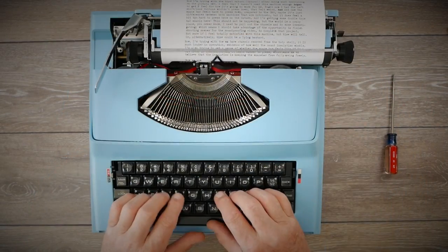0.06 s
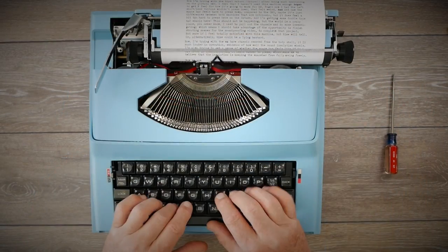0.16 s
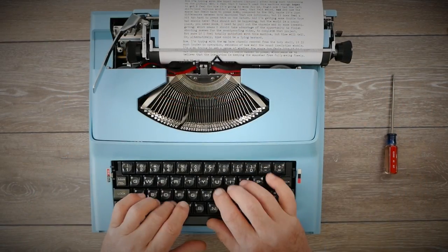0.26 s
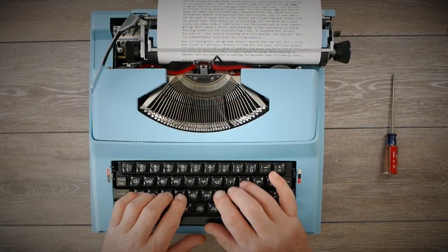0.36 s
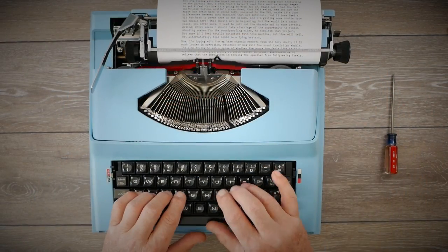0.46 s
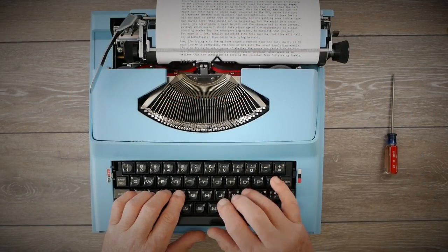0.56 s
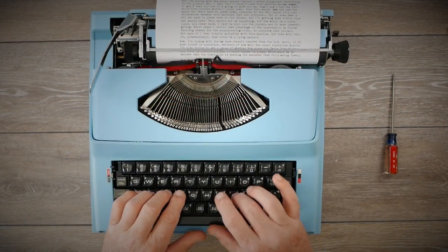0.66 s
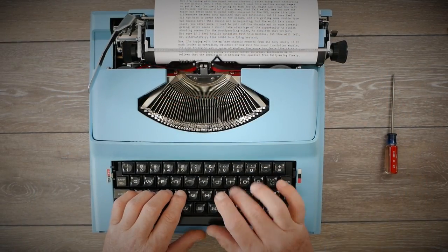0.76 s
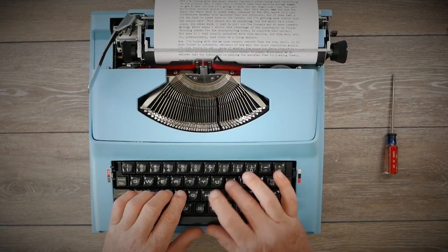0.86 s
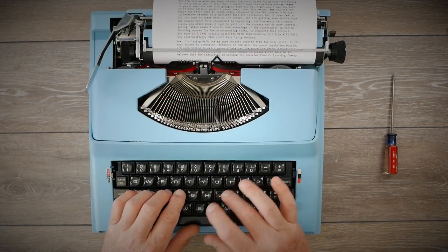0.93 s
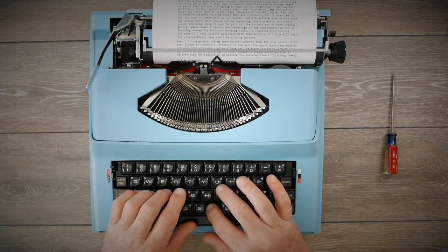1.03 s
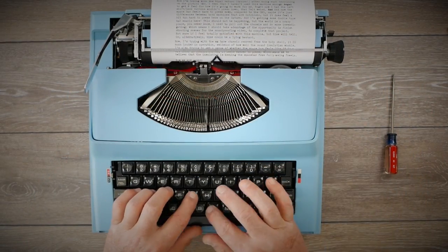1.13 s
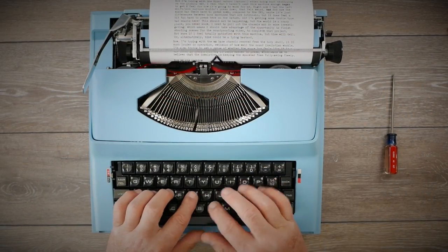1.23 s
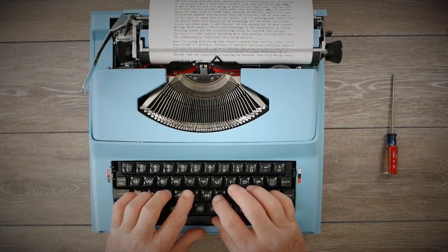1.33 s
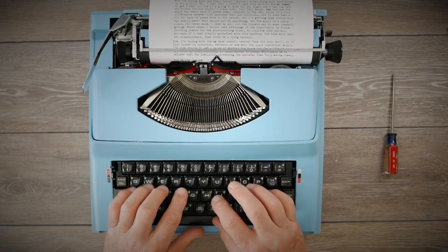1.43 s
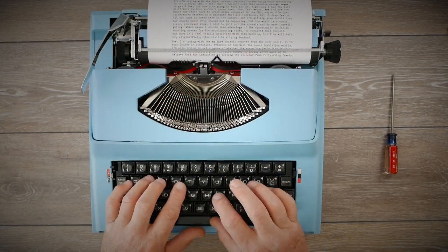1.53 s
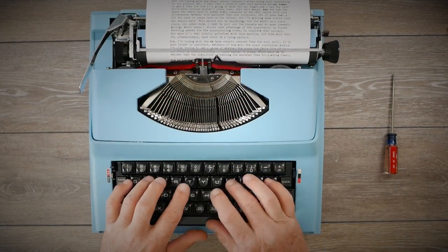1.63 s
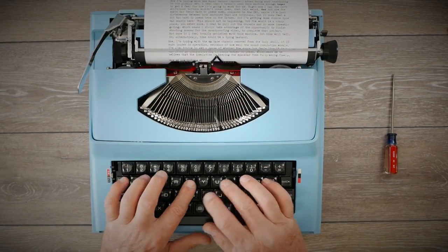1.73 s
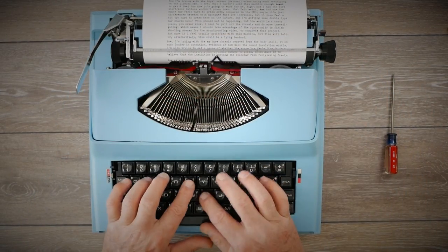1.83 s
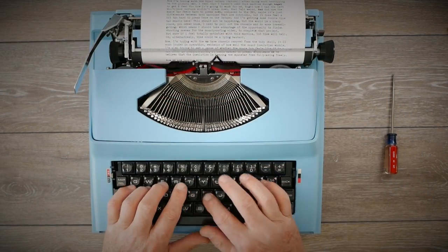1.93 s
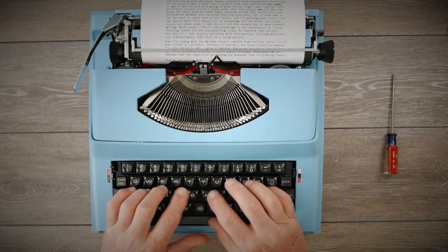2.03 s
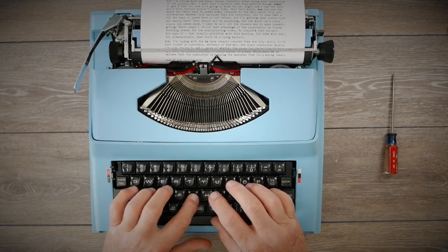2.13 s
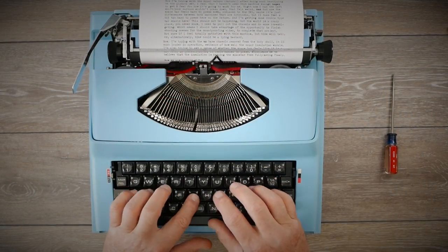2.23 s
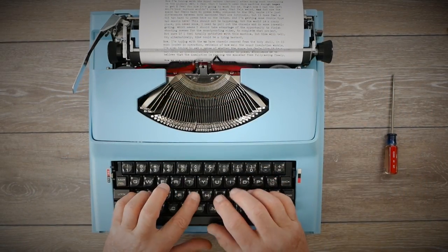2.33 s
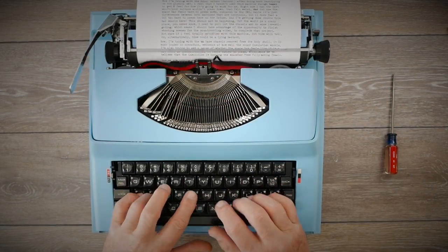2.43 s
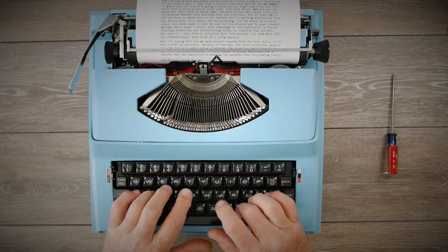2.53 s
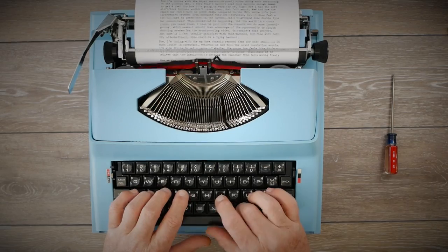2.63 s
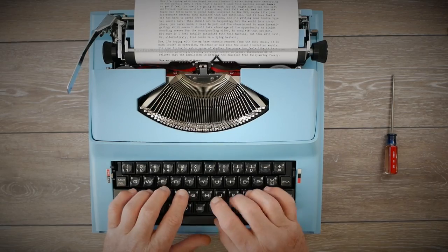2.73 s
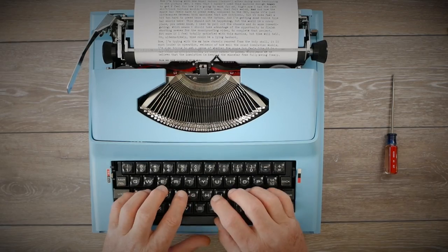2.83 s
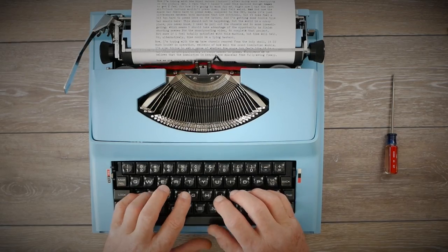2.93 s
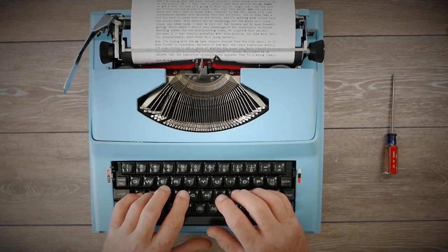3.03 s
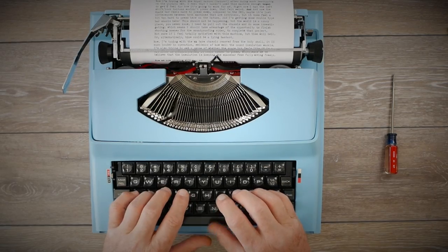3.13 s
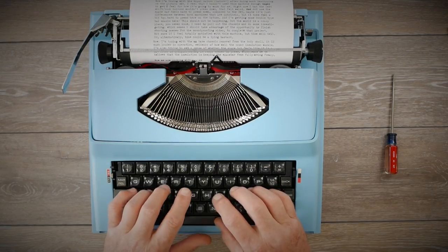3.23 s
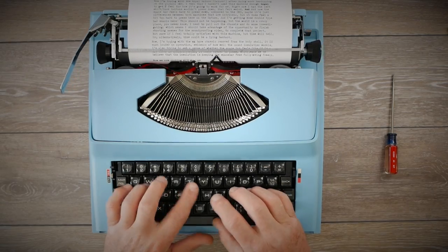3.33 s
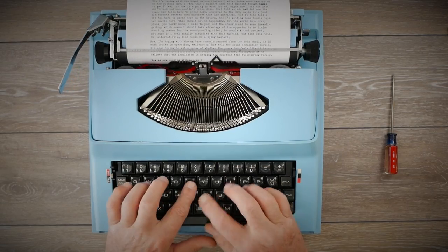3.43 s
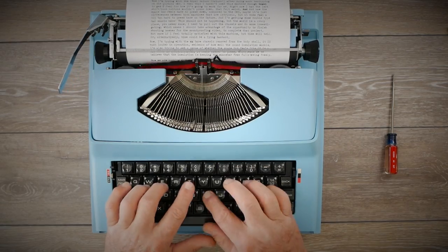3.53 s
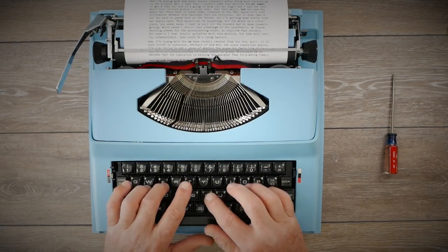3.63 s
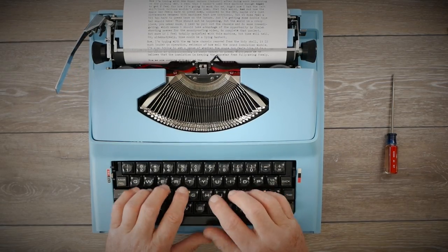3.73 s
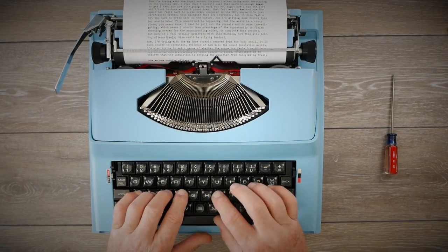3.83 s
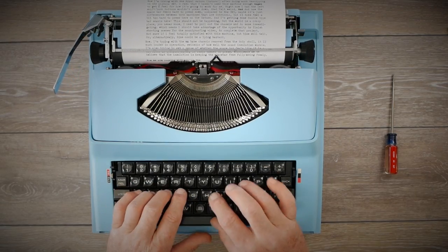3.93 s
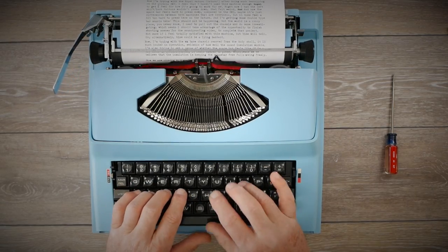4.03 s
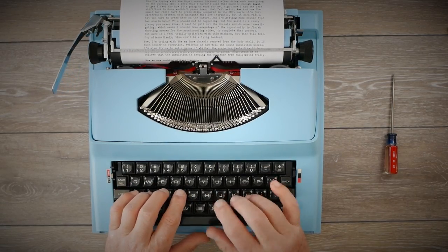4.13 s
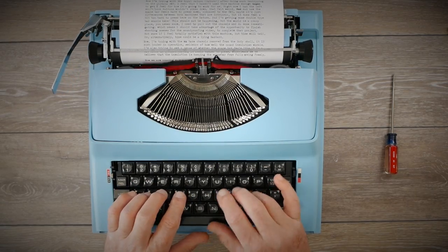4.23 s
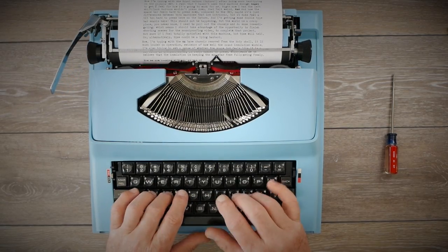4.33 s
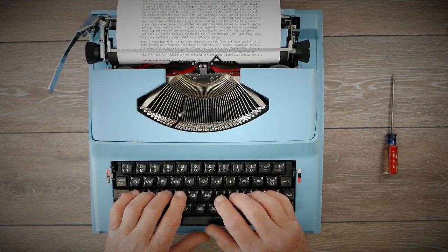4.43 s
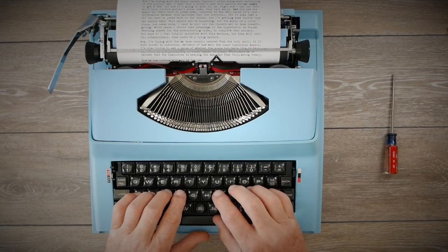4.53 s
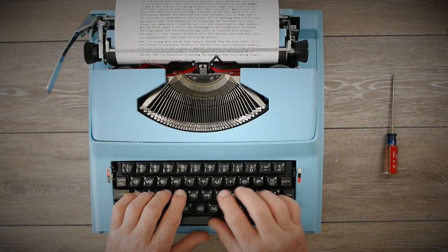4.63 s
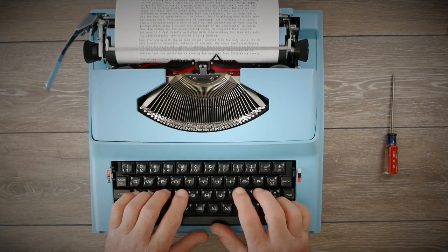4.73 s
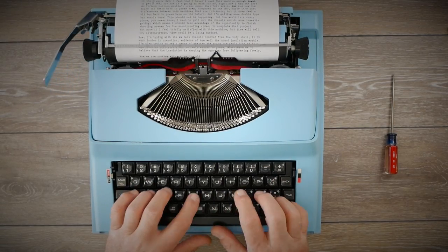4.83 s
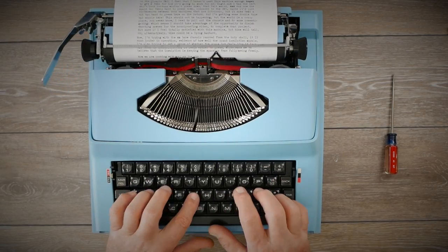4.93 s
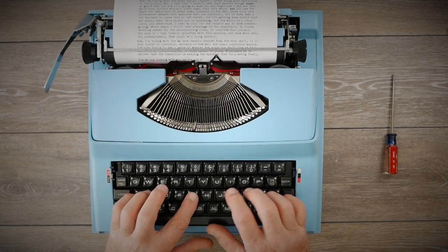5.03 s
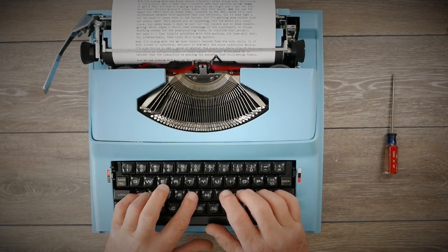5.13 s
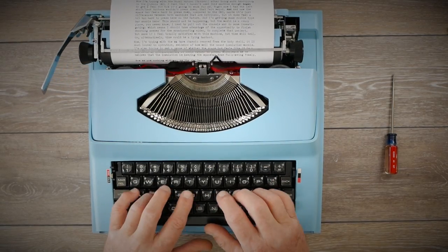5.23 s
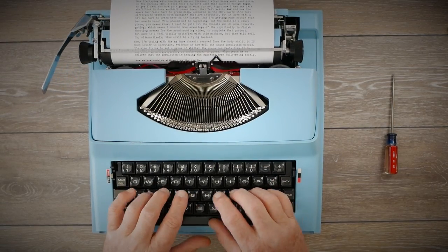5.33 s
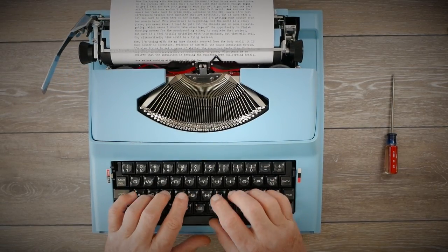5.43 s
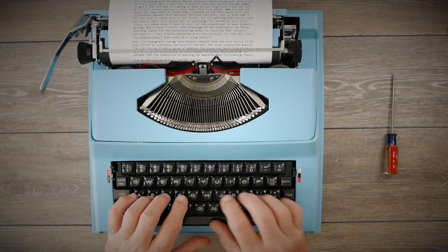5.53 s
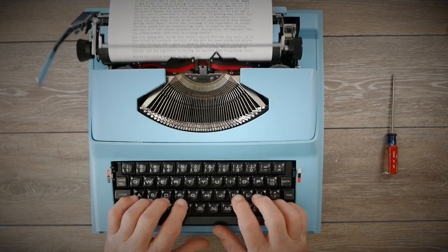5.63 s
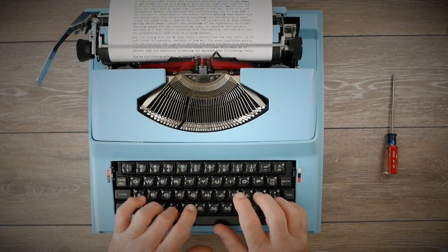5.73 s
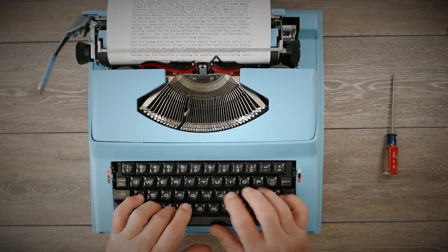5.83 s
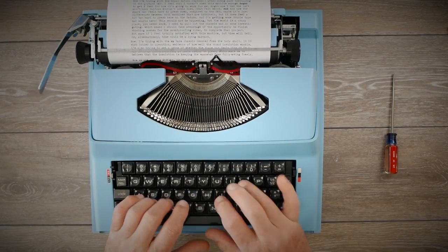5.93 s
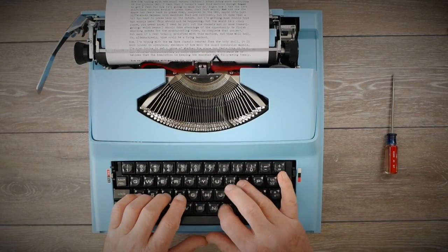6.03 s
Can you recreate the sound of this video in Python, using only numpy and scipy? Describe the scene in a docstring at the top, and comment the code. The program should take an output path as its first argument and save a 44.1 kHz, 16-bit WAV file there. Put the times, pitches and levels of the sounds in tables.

```python
"""A quiet room, where someone types fast on a typewriter, heard from close above and clipped at the loudest.
Each keystroke is a flurry of lever knocks, a soft thud of the key and the crack of the type slug on the roller
(the platen), then the rattle of the carriage step and the falling type bar. Parts that ring are decaying sines;
rough contacts are short bursts of uneven noise. Echoes of the room, a low rumble, hum and faint noise lie around."""
import sys
import numpy as np
from scipy import signal
from scipy.io import wavfile

SR = 44100
rng = np.random.default_rng(int(sys.argv[2]) if len(sys.argv) > 2 else 0)


def pcm_store(signal):
    """Save signal as 16-bit PCM."""
    levels = np.round(np.clip(np.atleast_2d(signal), -1, 1) * 32767)
    wavfile.write(sys.argv[1], SR, levels.astype(np.int16).T)


N = 267819  # length in samples

# One row per keystroke, timed by the slug hitting the platen; the leads count back from that hit.
# Levels are set before each layer's own trim: start_s, level_db, brightness_db, guide_lead_s (bar enters its guide),
# guide_level_db, pull_lead_s (lever pulls), pull_level_db, home_level_db (bar drops home), thud_level_db
STRIKES = [(0.2185, -3, -5, .007, -3, .028, -6, -26, -14), (0.3487, -3, -4, .0067, -7, .026, -17, -36, -17),
           (0.4794, -2.5, -7, .008, -8, .027, -16.5, -26, -23),
           (0.6868, -2.5, -3, .0078, -3.5, .027, -12, -40, -20),
           (0.8955, -3, -5, .0065, -5, .026, -12, -40, -18),
           (1.1021, -3, -3, .0064, -5, .031, -15, -29, -18),
           (1.1924, -2.5, -2, .0039, -11, .0105, -17, -33, -27),
           (1.6023, -3.5, 3, .0077, -3.5, .029, -10, -27, -20),
           (1.6512, -3.5, 0, .005, -13, .026, -18, -33, -30),
           (1.7797, -3, 2, .0065, -8, .029, -19, -33, -20.5),
           (1.9092, -2, 2, .0052, -7, .030, -19.5, -35, -22),
           (2.1971, -1.5, 2, .0044, -8, .031, -18, -36, -17),
           (2.3701, -3, 1, .0075, -6, .029, -15, -27, -23),
           (2.4232, -3, 2, .0046, -13, .018, -21, -33, -36),
           (2.6303, -2, -1, .0081, -6, .027, -17, -27, -19.5),
           (2.9208, -3, 0, .0092, -9, .0285, -8, -38, -20),
           (3.0525, -3, 2, .0077, -10, .0286, -21, -26, -26.5),
           (3.416, -4, -2, .0054, -8, .026, -19, -31, -23.5),
           (3.5445, -2.5, 1, .005, -11, .031, -25, -28, -24.5),
           (3.6365, -2.5, 1, .0075, -13.5, .026, -33, -35, -29),
           (4.0423, -2, 4, .0083, -8, .027, -21, -33, -21.5),
           (4.2502, -3, 4, .0084, -6, .025, -19, -28, -22.5),
           (4.3788, -2, 4, .0081, -12, .026, -22, -38, -25),
           (4.9014, -3, 6, .005, -7.5, .031, -15, -42, -22),
           (5.1138, -2, 6, .0078, -11, .030, -20, -30, -27),
           (5.2065, -3, 4, .0072, -15, .027, -24, -44, -38),
           (5.7688, -4, 6, .006, -11, .028, -14, -38, -24),
           (6.0168, -2, 6, .0077, -9.5, .0254, -16.5, -30, -27)]
BANDS_HZ = 200 * 2 ** np.arange(0, 6.5, .4)  # centres of the filter bank


def amp(db):
    """Turn decibels into a gain."""
    return 10 ** (np.asarray(db) / 20)


def rms_one(x):
    """Scale a sound to an average (rms) strength of 1."""
    return x / np.sqrt(np.mean(x ** 2) + 1e-20)


def at_hz(points, hz):
    """Read a level off a curve of (pitch, level) points, with pitch on a log scale."""
    points_hz, points_db = np.array(points).T
    return np.interp(np.log(hz), np.log(points_hz), points_db)


def clicks(s, gains):
    """Place one-sample clicks of the given heights at the given times."""
    out = np.full(N, 1e-18)
    places = (np.asarray(s) * SR).astype(int)
    np.add.at(out, np.minimum(places, N - 1), gains)
    return out


def ring(x, hz, t60):
    """A click sets a sine ringing, which falls by 60 dB in t60 seconds."""
    radius, angle = amp(-60 / (t60 * SR)), 2 * np.pi * hz / SR
    return signal.lfilter([0, np.sin(angle)], [1, -2 * radius * np.cos(angle), radius ** 2], x)


def fade(x, t60):
    """Each click becomes a sudden step that dies away."""
    return signal.lfilter([1], [1, -amp(-60 / (t60 * SR))], x)


def band(x, hz):
    """Keep only a narrow range of pitches around hz."""
    edges = [hz / 2 ** .2, hz * 2 ** .2]
    return signal.sosfilt(signal.butter(2, edges, "band", fs=SR, output="sos"), x)


def colour_db(hz, bright_db, body_db):
    """A hard contact lifts the treble, a heavy one the low body of the machine."""
    treble = np.clip(np.log2(hz / 4000), 0, 1)
    low = np.clip(np.log2(2500 / hz), 0, 1)
    return treble * bright_db + low * body_db


def grit(spread_db):
    """Noise made of uneven tiny impacts, at rms 1."""
    unevenness = np.minimum(rng.exponential(1, N), 4)
    return rms_one(rng.standard_normal(N) * amp(spread_db * unevenness))


def knocks(s, peak_db, bright_db, body_db, rise_s, t60, tail_db, tail_t60, scatter_db):
    """Bursts of grit, each with its own colour: a brief swell, a quick decay and a slower tail."""
    # noise spectrum of a knock: pitch_hz, level_db (per Hz)
    spectrum = [(300, -9), (600, -8), (1300, -2), (2000, -1), (3500, 1), (7000, -2.5), (10000, -7),
                (14000, -14), (17000, -15)]
    noise, out = [grit(2.2), grit(2.0)], 0
    scatter = rng.normal(0, scatter_db, (len(s), len(BANDS_HZ)))
    swell = np.exp(-1 / (rise_s * SR))
    for k, hz in enumerate(BANDS_HZ):
        gains = amp(peak_db + colour_db(hz, bright_db, body_db) + scatter[:, k])
        slower = (3000 / hz) ** 0.19  # lows last longer
        # squared gains are powers, which fade twice as fast in dB
        quick = fade(clicks(s, gains ** 2), t60 * slower / 2)
        tail = fade(clicks(s, (gains * amp(tail_db)) ** 2), tail_t60 * slower / 2)
        shape = np.sqrt(signal.lfilter([1 - swell], [1, -swell], quick + tail))
        out = out + amp(at_hz(spectrum, hz)) * band(shape * noise[k % 2], hz)
    return out


def struck(modes, s, peak_db, scatter_db, bright_db=0):
    """Every blow sets every mode ringing, with a strength and sign of its own."""
    size = (len(s), len(modes))
    strength = amp(rng.normal(0, scatter_db, size)) * rng.choice([-1, 1], size)
    out = 0
    for k, (hz, db, t60, *lift) in enumerate(modes):
        gains = amp(peak_db + db + sum(lift) * bright_db) * strength[:, k]
        out = out + ring(clicks(s, gains), hz, t60)
    return out


def slugs():
    """The crack on the platen: short ringing modes, a burst of grit and thin levers set ringing."""
    # slug, platen and paper: pitch_hz, level_db, t60_s, lift (dB gained per dB of brightness)
    platen = [(1450, -15.5, .016, 0), (2000, -17, .008, 0), (3000, -10, .011, -.6), (3800, -6.5, .009, 0),
              (4620, -5, .009, -.4), (6200, -9, .007, .3), (7200, -5, .010, .9), (9400, -7, .006, 0),
              (11000, -11, .004, -.3), (13500, -13, .004, -.5)]
    # thin levers that ring on faintly: pitch_hz, level_db, t60_s
    levers = [(6415, -58, .5), (10150, -64, 1.1), (10260, -64, .8), (10340, -65, .9)]
    s, peak_db, bright_db = np.transpose(STRIKES)[:3]
    crack = struck(platen, s, peak_db + 1.5, scatter_db=2.5, bright_db=bright_db)
    burst = knocks(s, peak_db - 3.0, bright_db, body_db=-9.5, rise_s=0.00022, t60=.009,
                   tail_db=-7, tail_t60=0.038, scatter_db=2.5)
    return crack + burst + struck(levers, s, peak_db, scatter_db=3.0)


def thuds():
    """Soft blows ring the low modes of the case, which radiates little below them."""
    # space bar and keys that bottom without printing: start_s, level_db
    silent_keys = [(0.042, -14), (1.329, -29), (1.525, -26), (1.697, -28), (3.188, -35), (3.353, -32.5),
                   (3.955, -28.5), (4.655, -26), (4.784, -23), (5.52, -34), (5.663, -30.5)]
    # low modes of the case: pitch_hz, level_db, t60_s
    case = [(160, -6, 0.11), (243, -4.5, 0.042), (339, -5, 0.1), (449, -6, 0.13)]
    lead_s = .021  # the key bottoms this long before the slug strikes
    printing_keys = [(row[0] - lead_s, row[-1]) for row in STRIKES]
    s, peak_db = np.transpose(printing_keys + silent_keys)
    soft = signal.lfilter([.03], [1, -.97], struck(case, s, peak_db - 1.5, scatter_db=0.0))
    return signal.sosfilt(signal.butter(2, 110, "high", fs=SR, output="sos"), soft)


def all_contacts():
    """List the run of parts knocked in each keystroke, then the loose knocks, in the columns of loose."""
    # knocks between strikes (fingers landing, keys let go, space bar):
    # start_s, level_db, brightness_db, body_db, pitch_hz, tail_db (against the peak)
    loose = [(0.0082, -36, -5, -8, 1360, 0), (0.017, -35, -14, 0, 2330, 0),
             (0.0272, -15.5, -2, 1.5, 1280, -2.5), (0.0403, -17, 1.5, 2, 2220, -2),
             (0.0948, -36, -1, 6, 1280, 2), (0.154, -7.5, 3.5, -12, 4440, -27),
             (0.1668, -11, 5, -3, 3990, -9.5), (0.183, -13, 1, -11, 4840, -2), (0.53, -32, -8, 6, 1300, -2),
             (0.5916, -33, -15, 5, 1220, -1), (0.625, -34, 0, -11, 3400, 0),
             (0.632, -20.5, 2, -13, 6310, -9), (0.648, -25, 7, -11, 6170, -3),
             (0.797, -34, -15, 8, 900, -3), (0.8375, -22, 2, -1, 9100, -2.5),
             (0.8473, -22, 8.5, -27, 11300, -7), (1.02, -38, -19, 15, 1190, -3.5),
             (1.0353, -17, 3, -25, 4670, -12), (1.045, -17, 7.5, -11, 9240, -12),
             (1.2835, -26.5, -4, -6, 6590, -3), (1.312, -33, -1, 10, 2580, -4),
             (1.3324, -28, -1, -5, 4260, 0.5), (1.358, -35.5, -14, 5, 2180, -2),
             (1.4731, -42, -15, 12, 900, -2), (1.5074, -21.5, -7.5, 3.5, 6610, -4.5),
             (1.5203, -18.5, -6, -17, 2280, -4.5), (1.5251, -17.5, 7, 0, 8400, -15),
             (1.5338, -23, 12, 6, 2310, -8), (1.7385, -27, 5, 0, 10550, 1.5),
             (2.062, -25, -2.5, -3, 6700, -1), (2.1465, -22, 3, -7, 5760, -9), (2.3033, -38, 4, 3, 1840, 5),
             (2.5493, -29.5, 7, -13, 4010, -5), (2.5554, -24, 3, -4, 4900, -15),
             (2.5778, -33, 6, -6, 1550, -5), (2.755, -38, -20, 4.5, 1200, -3.5),
             (2.8647, -35, 0, -3, 2390, -1), (2.872, -15.5, -6.5, 2, 6300, -9.5),
             (2.9741, -24, -3, -7, 1870, -5), (3.1866, -26.5, -3.5, -7, 5460, -3),
             (3.3341, -21, -8, 0, 6470, -4), (3.3511, -25.5, -9, -8, 4440, -6),
             (3.364, -23, 7.5, -1, 11010, -5.5), (3.3723, -24.5, 8, -4, 5200, -5),
             (3.5575, -22, -5, -13, 3330, 2), (3.6494, -16, 1, -14, 3480, -4),
             (3.8039, -32, -4, -5, 6070, -1), (3.9352, -19, -7, 0, 6170, -5),
             (3.9517, -30.5, -16, 3, 4290, -1), (3.9656, -18.5, 9.5, -14, 8400, -8),
             (4.1928, -29, 7, -18, 6030, -13), (4.2044, -30, 2, -3, 4060, -3),
             (4.3233, -30, 9, -9, 4690, -2), (4.515, -29, -3.5, -4, 5230, -1),
             (4.5835, -39, 0, -10, 4120, -12), (4.6415, -20, -5, 1, 1300, -3.5),
             (4.6585, -25, -6, -8.5, 2350, -6), (4.691, -36, -6.5, 1, 2480, -7),
             (4.7186, -35, 7, -8, 5490, -5), (4.7832, -32, -4, -1, 1570, 5),
             (4.7963, -13.5, 0, -11.5, 4980, -3), (4.8052, -15, -2, -15, 2500, -4.5),
             (4.811, -27, 0, 8, 4540, -4), (4.835, -25.5, 4, 4, 6150, -8), (5.0212, -33, -10, -2, 4250, -1),
             (5.0277, -21.5, 2, -4.5, 4370, -1.5), (5.0427, -29, -8, -15, 4770, -1),
             (5.3338, -29, 1, -8, 3620, -6), (5.3624, -29, 0, -3.5, 2630, -6.5),
             (5.5087, -29, 0, 8, 1290, -3.5), (5.525, -28.5, -5, -18, 4370, 0), (5.57, -42, 5, 3, 2400, 0),
             (5.602, -30, 0, -17, 4660, -10), (5.665, -29, 2, 2, 7200, -2),
             (5.6757, -16, 2.5, -8, 4540, -6.5), (5.6833, -13.5, -2, -9, 4720, -2),
             (5.7196, -28, 6, 8, 4550, -9), (5.8474, -24.5, 7, 0, 3860, -1), (5.905, -37, -8, 4, 1500, 0),
             (5.9295, -30, 0, -1, 4840, -4), (5.9507, -27, -5, -18, 5200, -4), (5.9748, -38, 4, 0, 2200, 3)]
    # bar entering its guide: brightness_db, body_db, pitch_hz, tail_db
    guide = (1, -8.5, 2740, 0)
    # lever pulling: brightness_db, body_db, pitch_hz, tail_db
    pull = (1, -6, 4600, -2)
    # slack taken up first: lead_share (of the pull's lead), level_db, pull_share (of the pull's dB, added),
    # brightness_db, body_db, pitch_hz, tail_db
    slack = (1.26, -16, .45, -1, -7, 5900, 0)
    # key lever meeting its stop: lead_s (before the strike), level_db (over the thud),
    # brightness_db, body_db, pitch_hz, tail_db
    bottom = (.0165, 2.5, 1, -3, 1400, -1)
    # the bar drops home this long after the strike: brightness_db, body_db, pitch_hz, tail_db
    fall_back_s, fall_back = .064, (2, -8, 3900, -2)
    pull_usual_db, guide_usual_db = -18, -11
    cleaner = .55  # a harder knock scuffs less: dB of tail lost per dB above the usual level
    pitch_spread = .08  # pitches differ from key to key by about this share
    rows, detune = [], 1 + pitch_spread * rng.standard_normal((len(STRIKES), 4))
    for (s, _, _, guide_s, guide_db, pull_s, pull_db, home_db, thud_db), own in zip(STRIKES, detune):
        pull_tail_db = pull[3] - cleaner * max(pull_db - pull_usual_db, 0)
        guide_tail_db = guide[3] - cleaner * max(guide_db - guide_usual_db, 0)
        parts = [(s - slack[0] * pull_s, slack[1] + slack[2] * pull_db, *slack[3:]),
                 (s - pull_s, pull_db, *pull[:3], pull_tail_db),
                 (s - bottom[0], thud_db + bottom[1], *bottom[2:]),
                 (s + fall_back_s, home_db, *fall_back)]
        rows += [(*part[:4], part[4] * k, part[5]) for part, k in zip(parts, own)]
        rows.append((s - guide_s, guide_db, *guide[:3], guide_tail_db))
    return [row for row in rows + loose if row[0] < N / SR]


def ticks(contacts, gain_db, t60):
    """Each knocked part rings briefly at its own pitch, as a pair of close sines."""
    length = 1500  # samples in one tick
    out, t = np.zeros(N + length), np.arange(length) / SR
    apart = rng.uniform(.05, 0.15, len(contacts))
    for (s, peak_db, _, _, hz, _), gap in zip(contacts, apart):
        pair = np.sin(2 * np.pi * hz * t) + 0.44 * np.sin(2 * np.pi * hz * (1 + gap) * t)
        fall_db = -60 * t / t60 * np.sqrt(hz / 4000)  # higher parts die sooner
        onset = 1 - np.exp(-t * hz)
        start = int(s * SR)
        out[start:start + length] += amp(peak_db + gain_db + fall_db) * onset * pair
    return out[:N]


def linkage(contacts):
    """The noisy part of each knock in the lever train: a quick burst and a scuffing tail."""
    s, peak_db, bright_db, body_db, _, tail_db = np.transpose(contacts)
    return knocks(s, peak_db - 0.5, bright_db, body_db + 8, rise_s=0.00088, t60=0.0067,
                  tail_db=tail_db, tail_t60=.1, scatter_db=2.2)


def rattle():
    """The carriage steps on and the bar falls back: an uneven shaking that follows each strike."""
    # how the rattle swells and fades: after_s (after the strike), level_db (against the strike)
    course = [(0, -56.5), (.002, -26), (.008, -32), (.025, -31.5), (0.06, -30.5), (0.088, -43.5),
              (.15, -56.5), (.25, -79)]
    # noise spectrum of the rattle: pitch_hz, level_db (per Hz)
    spectrum = [(120, -39), (200, -13.5), (735, -4), (1060, -3), (1320, -3), (1620, -7.5), (9060, -7.5),
                (14600, -24.5), (16000, -28.5)]
    s, peak_db = np.transpose(STRIKES)[:2]
    after, db = np.transpose(course)
    # doubling the dB gives powers, so that overlapping rattles add as powers
    shape = amp(2 * np.interp(np.arange(int(.25 * SR)) / SR, after, db))
    power = np.abs(signal.fftconvolve(clicks(s, amp(2 * peak_db)), shape)[:N])
    # loose parts bump now and then, about 130 times a second
    bumps = (rng.random(N) < 130 / SR) * rng.exponential(1, N)
    jolts = fade(bumps, 0.018)
    noise = (1 + 0.6 * jolts) * np.array([grit(1.6), grit(1.8)])
    shaking = sum(amp(at_hz(spectrum, hz)) * band(noise[k % 2], hz) for k, hz in enumerate(BANDS_HZ))
    return np.sqrt(power) * rms_one(shaking)


def touches():
    """Fingertips brush the key tops in the pauses: faint dry bursts of grit."""
    # moments of the brushes: start_s
    brushes = [1.4222, 1.4885, 2.8494, 3.3174, 3.92, 4.7621, 5.4924, 5.6401]
    return knocks(brushes, peak_db=-42, bright_db=-2.5, body_db=-2, rise_s=.001, t60=0.018,
                  tail_db=-8.5, tail_t60=0.063, scatter_db=1.5)


def frame(x):
    """The steel frame and case resonate, so some pitches stand out of whatever shakes them."""
    # resonances: pitch_hz, width_hz, level_db (of the resonance added to the plain sound)
    resonances = [(444, 68, 1.5), (672, 46, -2.5), (881, 32, -8), (1316, 49, 1.5), (1783, 62, -6),
                  (2636, 55, -12.5), (3816, 77, -8), (4424, 49, -7.5), (7190, 60, -14), (9280, 170, -6),
                  (13400, 200, -4.5)]
    out = x
    for hz, width, lift_db in resonances:
        r = np.exp(-np.pi * width / SR)
        poles = [1, -2 * r * np.cos(2 * np.pi * hz / SR), r * r]
        out = out + amp(lift_db) * signal.lfilter([(1 - r * r) / 2, 0, (r * r - 1) / 2], poles, x)
    return out


def room(x):
    """Echoes between the walls: eight feedback delays, fainter and duller on every round."""
    t60_s, wall_cut_hz = 0.51, 4160
    out, dull = np.zeros(N), np.exp(-2 * np.pi * wall_cut_hz / SR)
    lags = (rng.uniform(0.014, 0.044, 8) * SR).astype(int)
    for k, lag in enumerate(lags):
        loop, gain, state = x.copy(), amp(-60 * lag / SR / t60_s), [0.]
        for i in range(lag, N, lag):  # one delay length at a time
            back, state = signal.lfilter([gain * (1 - dull)], [1, -dull], loop[i - lag:i], zi=state)
            loop[i:i + lag] += back[:N - i]
        out += (loop - x) * (-1) ** k  # echoes only, with alternating sign
    return out


def background():
    """Rumble through the table (low noise), mains hum (steady sines) and room noise (shaped noise)."""
    # slow course of the rumble: time_s, level_db
    rumble_course = [(0.0, -53), (0.07, -35), (0.27, -50), (1.08, -48), (1.28, -52), (1.37, -43),
                     (1.5, -54), (1.55, -39), (1.64, -50), (4.75, -53), (4.8, -39), (5.02, -54),
                     (5.04, -47), (5.51, -55), (5.76, -41), (5.78, -49), (6.04, -51), (6.07, -58)]
    # hum tones: pitch_hz, level_db (before a 1.5 dB lift)
    hum_tones = [(120, -57.5), (240, -64)]
    # spectrum of the room noise: pitch_hz, level_db (per Hz, before the overall level)
    air_spectrum = [(100, -5), (250, -5), (600, -7.5), (1400, -12.5), (2000, -21), (6000, -25.5),
                    (9000, -46), (16000, -57)]
    t = np.arange(N) / SR
    low_pass_band = signal.butter(3, [26, 92], "band", fs=SR, output="sos")
    low = signal.sosfilt(low_pass_band, rng.standard_normal(N + SR))[SR:]  # skip the filter's start
    rumble = amp(np.interp(t, *np.transpose(rumble_course))) * rms_one(low)
    # each tone is a steady sine, lifted 1.5 dB
    hum = sum(amp(db + 1.5) * np.sin(2 * np.pi * hz * t) for hz, db in hum_tones)
    noise = rng.standard_normal((2, N))
    centres_hz = [120, 155, *BANDS_HZ]
    air = sum(amp(at_hz(air_spectrum, hz)) * band(noise[k % 2], hz) for k, hz in enumerate(centres_hz))
    return rumble + hum + amp(-55) * rms_one(air)


def scene():
    """The machine, its room and the background, in the centre with a faint, dull, flickering width."""
    contacts = all_contacts()
    shaken = linkage(contacts) + touches() + rattle()
    machine = slugs() + ticks(contacts, gain_db=-3.0, t60=.018) + frame(shaken) + thuds()
    mid = machine + amp(-20.5) * room(machine) + background()
    # a new random width every 400 samples, joined by straight lines
    steps = N // 400 + 2
    flicker = np.interp(np.arange(N) / 400, np.arange(steps), rng.standard_normal(steps))
    side = amp(-30) * flicker * signal.lfilter([.4], [1, -.6], mid)
    return np.array([mid + side, mid - side])


def record(dry):
    """The cracks overload the converter, which clips their peaks; then the top is cut above 15700 Hz."""
    clipped = np.clip(dry, -.9, .9)
    return signal.sosfilt(signal.ellip(10, .5, 60, 15700, fs=SR, output="sos"), clipped)


dry = scene()
out = record(dry)
pcm_store(out)
```